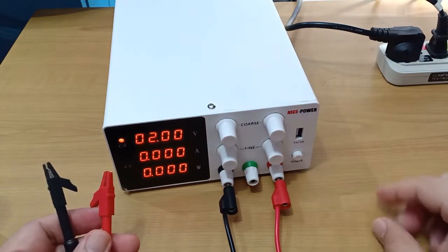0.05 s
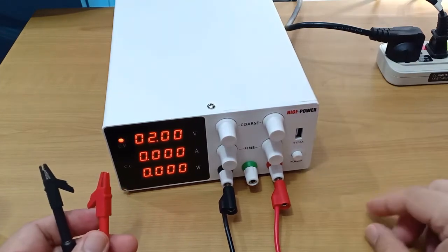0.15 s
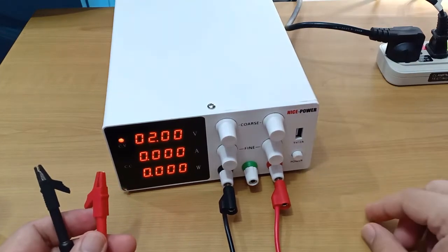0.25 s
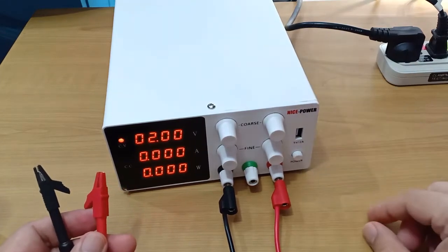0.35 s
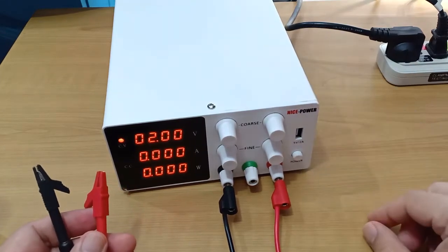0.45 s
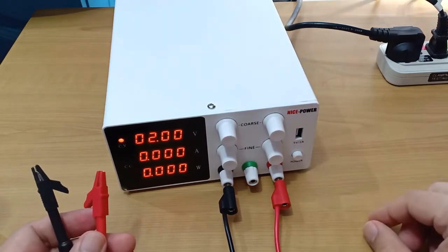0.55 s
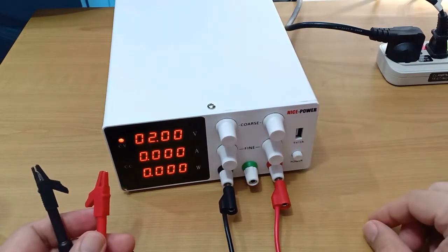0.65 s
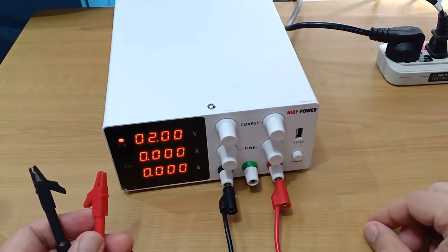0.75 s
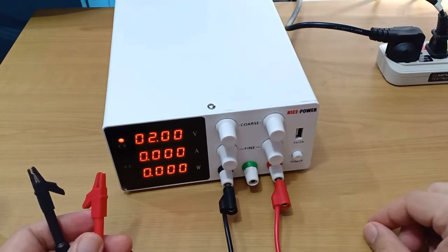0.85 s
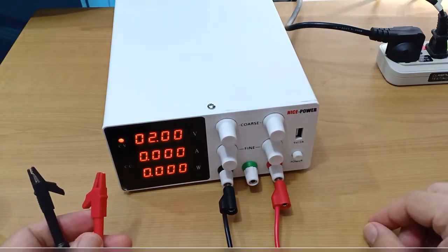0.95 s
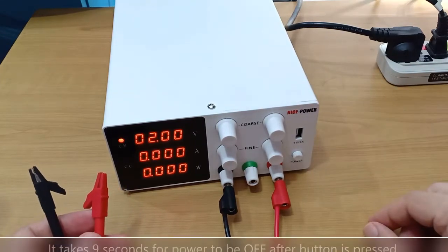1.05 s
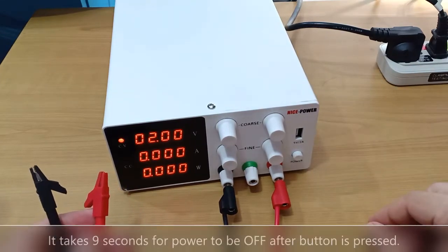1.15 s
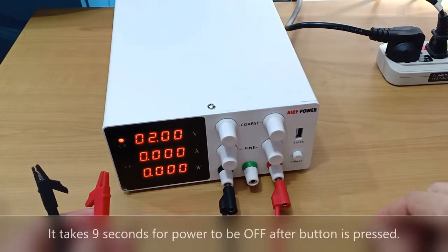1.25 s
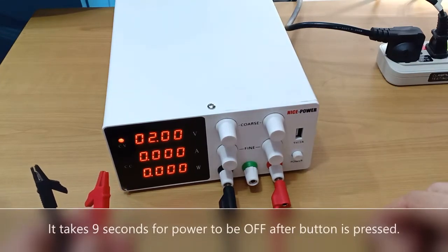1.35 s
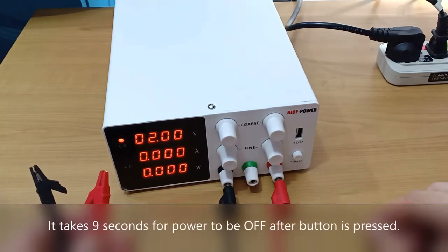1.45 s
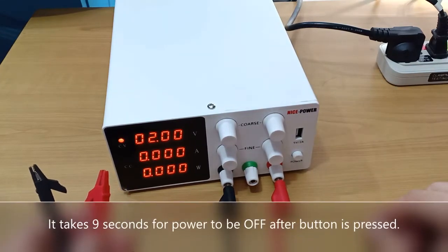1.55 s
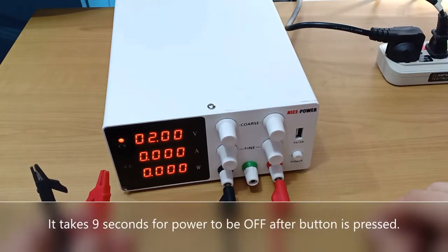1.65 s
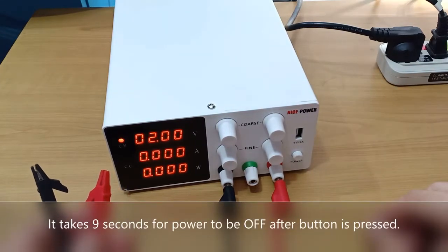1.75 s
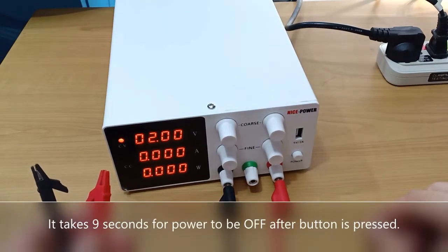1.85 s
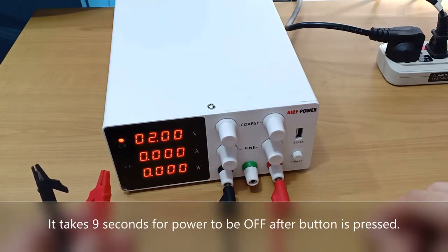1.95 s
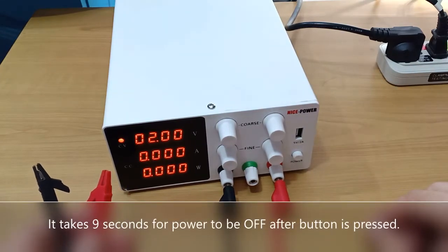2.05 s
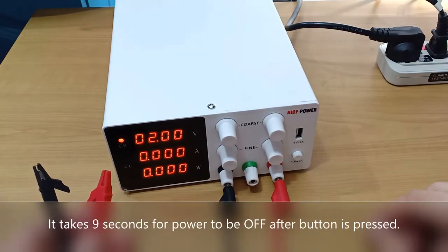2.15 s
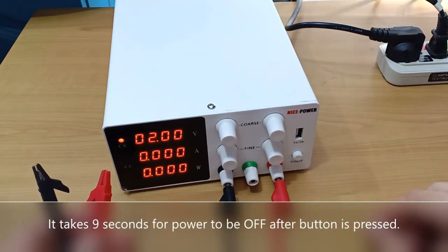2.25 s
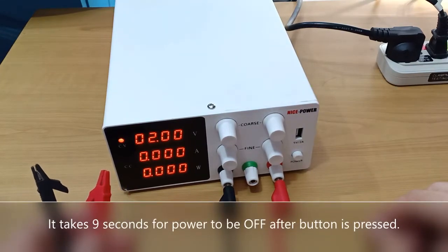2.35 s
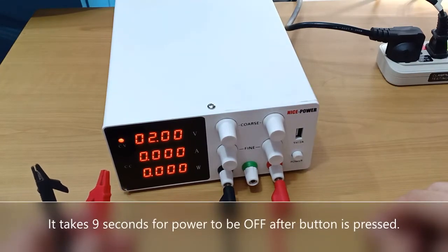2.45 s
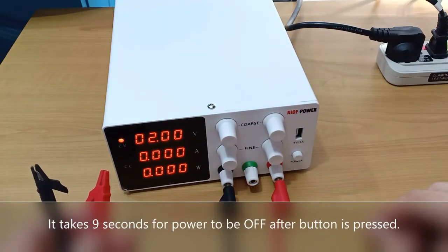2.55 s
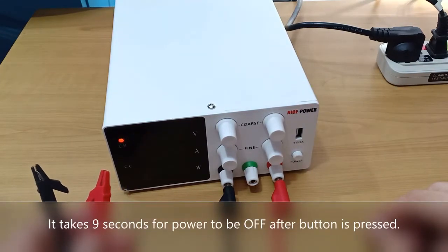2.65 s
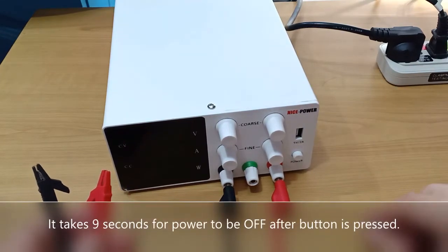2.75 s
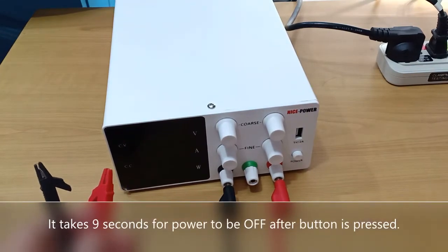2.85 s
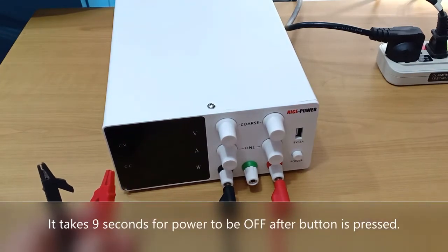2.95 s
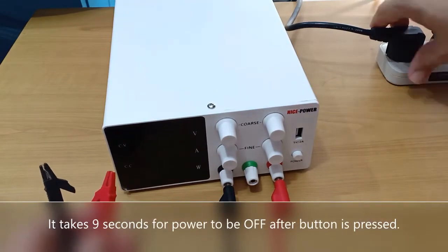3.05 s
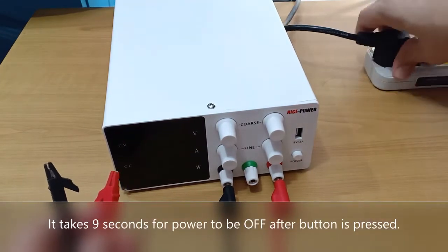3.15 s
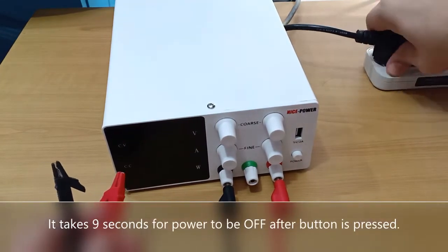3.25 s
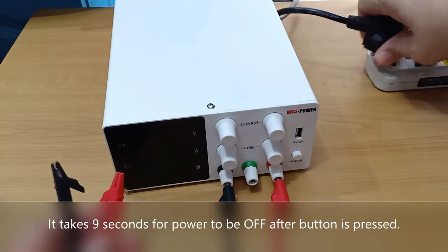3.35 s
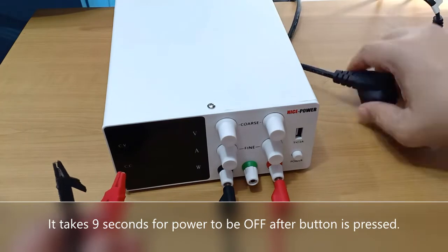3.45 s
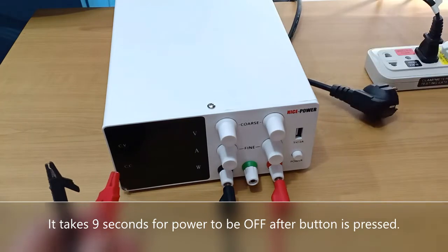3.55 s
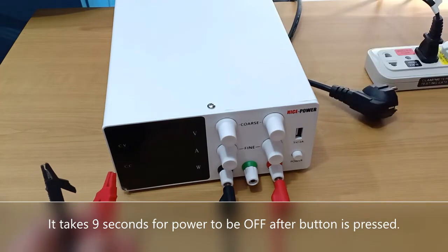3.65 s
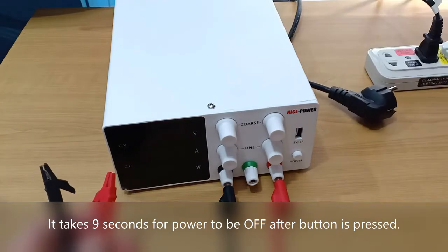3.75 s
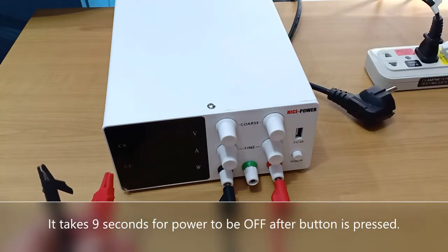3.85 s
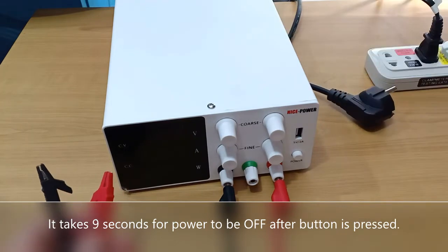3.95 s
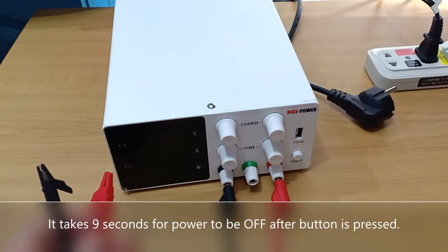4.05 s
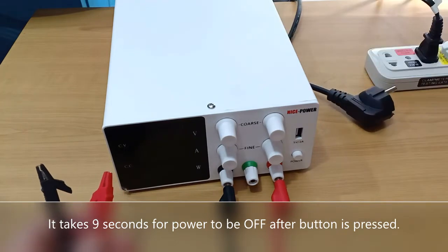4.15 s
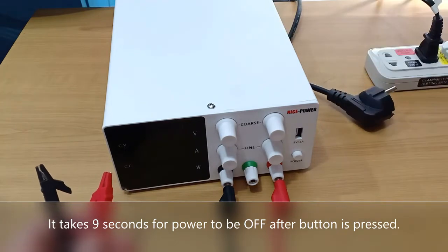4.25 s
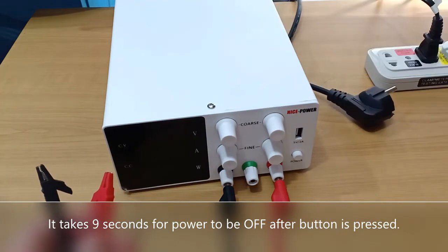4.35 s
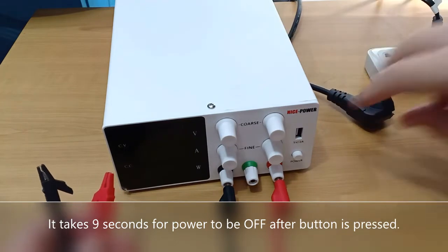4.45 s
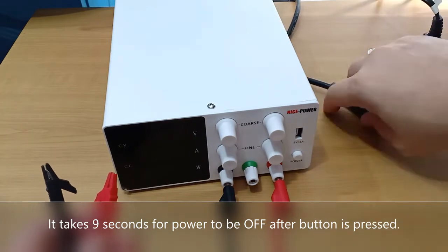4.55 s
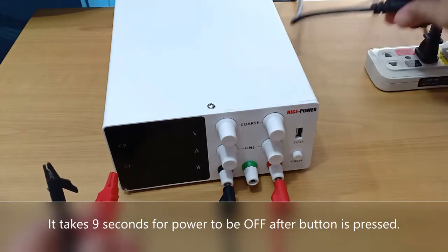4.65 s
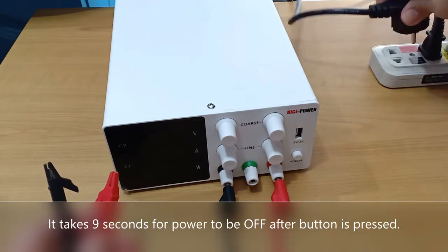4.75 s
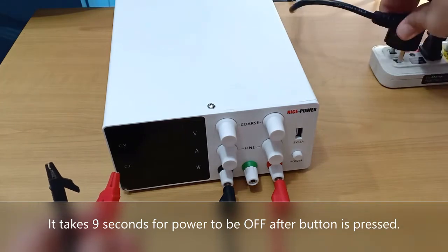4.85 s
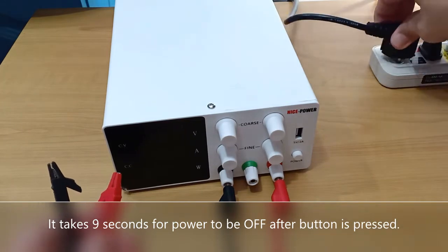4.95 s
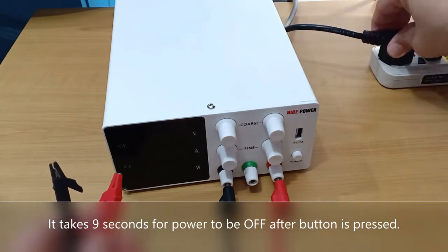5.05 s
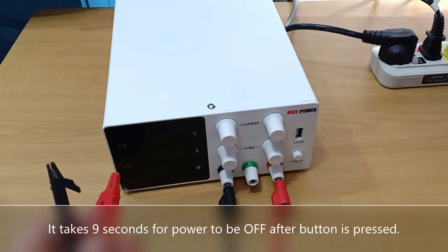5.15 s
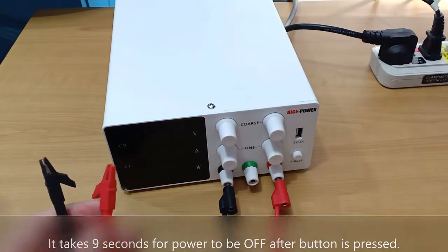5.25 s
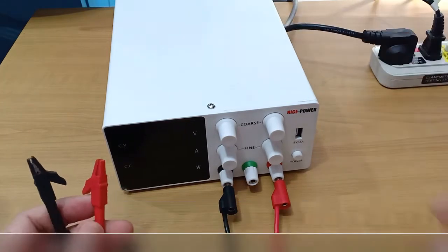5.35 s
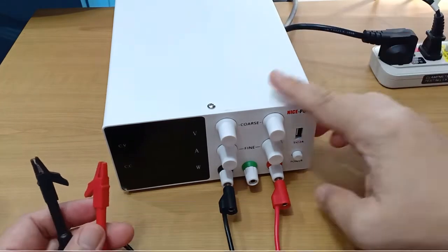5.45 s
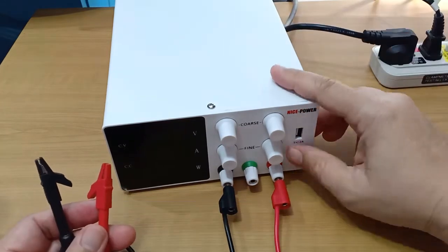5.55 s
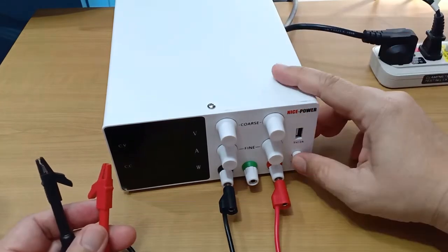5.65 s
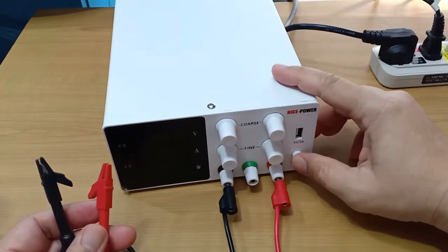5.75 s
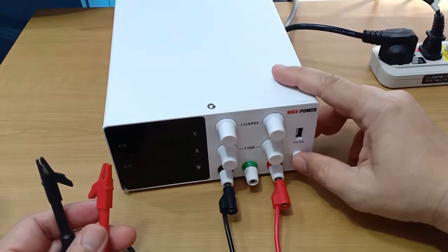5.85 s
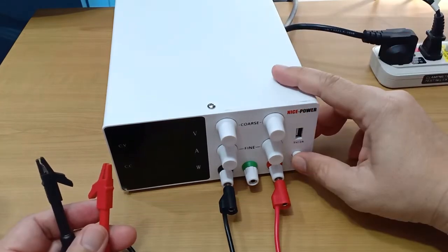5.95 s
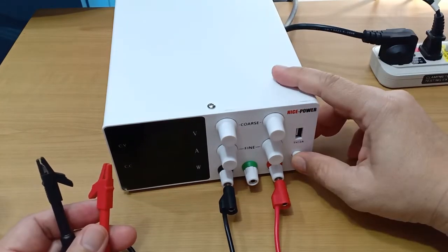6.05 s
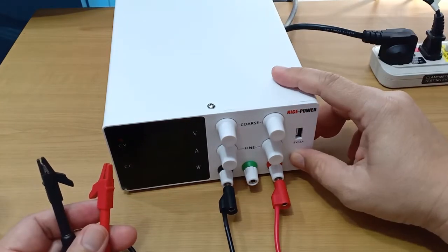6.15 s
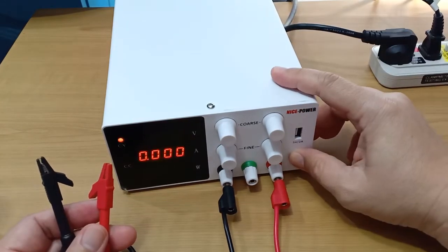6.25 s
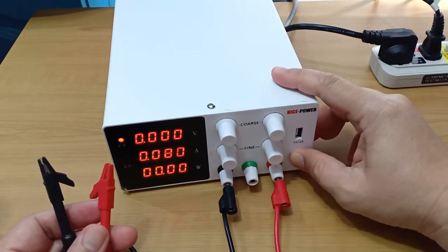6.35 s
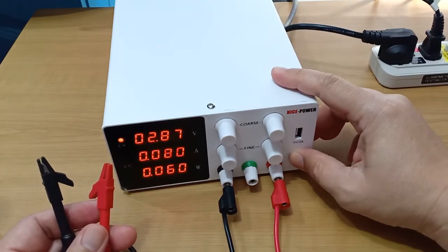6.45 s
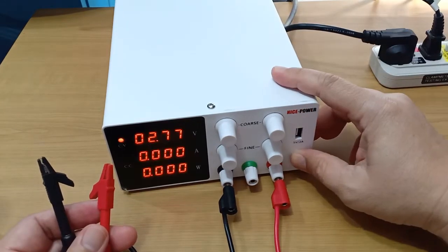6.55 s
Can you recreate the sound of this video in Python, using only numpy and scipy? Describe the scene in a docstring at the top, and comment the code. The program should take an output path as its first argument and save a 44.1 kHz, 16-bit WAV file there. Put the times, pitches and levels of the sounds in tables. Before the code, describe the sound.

In a quiet room, a faint hiss runs under a clock's quick, soft ticking, and a distant engine swells and fades. Nearby, a plug clacks and scrapes out of a plastic socket strip and is laid on a wooden desk. It is picked up and pushed back in with a firm clack. Then a bench power supply's button clicks sharply, ringing its metal case briefly, and clicks more softly on release.

```python
"""A bench power supply's plug is pulled, laid on a wooden desk and pushed back in; then its button clicks on.
Each bump of the plug rings the plastic socket strip, knocks the desk and snaps the metal pins. The button snaps
a cap and a spring, and the metal case and the room ring on for a moment. Behind it a room murmurs and a far
engine passes. Through the long middle stretch the murmur gives way to a brighter hiss, and sharp ticks come
four times a second."""
import sys
import numpy as np
from scipy import signal
from scipy.fft import rfft, irfft, next_fast_len
from scipy.io import wavfile
from scipy.ndimage import map_coordinates

SR = 44100
rng = np.random.default_rng(int(sys.argv[2]) if len(sys.argv) > 2 else 0)


def digitize_waveform(pressure):
    """Quantize a signal to 16-bit integers and store it at the path in sys.argv[1].

    Rows of a 2-D input are taken as channels; values are limited to [-1, 1].
    """
    field = np.atleast_2d(pressure).T
    bounded = np.clip(field, -1, 1)
    quanta = np.round(bounded * 32767).astype(np.int16)
    wavfile.write(sys.argv[1], SR, quanta)


N = 291187
HISS_START_S, HISS_END_S = 0.6464, 5.717


def amp(db):
    """Turn decibels into a gain; amp(-60 * t / t60) fades by 60 dB in t60 seconds."""
    return 10 ** (np.asarray(db) / 20)


def unit(x):
    """Scale a steady sound to an average strength (rms) of 1."""
    return x / np.sqrt(np.mean(x ** 2) + 1e-20)


def unit_hit(x):
    """Scale a short sound, ear by ear, to the energy of 10 ms at rms 1."""
    return x * np.sqrt(SR / 100 / (np.sum(x ** 2, axis=-1, keepdims=True) + 1e-20))


def along(points, hz):
    """Read between (f/Hz, value) points, on a log frequency scale."""
    freqs, values = np.transpose(points)
    return np.interp(np.log(hz + 1), np.log(freqs + 1), values)


def seconds(size):
    return np.arange(size) / SR


def wobble(rate):
    """A smooth curve through `rate` random values a second."""
    return map_coordinates(rng.standard_normal(int(N * rate / SR) + 4), [seconds(N) * rate])


def filtered(x, response):
    """Pass x through a filter, given as a function of frequency."""
    size = 2 * next_fast_len(x.shape[-1] // 2 + 4096)
    return irfft(rfft(x, size) * response(np.fft.rfftfreq(size, 1 / SR)), size)[..., :x.shape[-1]]


def colour(points):
    """A filter shaped by (f/Hz, level/dB) points that never rings ahead of the sound."""
    def response(hz):
        cepstrum = irfft(np.log(amp(along(points, hz))))
        cepstrum[1:len(hz) - 1] *= 2
        cepstrum[len(hz):] = 0
        return np.exp(rfft(cepstrum))
    return response


def resonances(modes):
    """A filter that rings at each (f/Hz, width/Hz, level/dB); narrow ones ring longer."""
    return lambda f: sum((-1) ** k * amp(db) * 1j * f * width / (hz * hz - f * f + 1j * f * width)
                         for k, (hz, width, db) in enumerate(modes))


def panned(sound, pan_db):
    """Make the left ear pan_db louder than the right."""
    return sound * amp([[pan_db / 2], [-pan_db / 2]])


def add(track, start_s, sound, pan_db=0):
    """Mix a stereo sound into the track."""
    part = track[:, round(start_s * SR):][:, :sound.shape[1]]
    part += panned(sound, pan_db)[:, :part.shape[1]]


def noise(size, alike):
    """Stereo white noise; `alike` lists (f/Hz, likeness), where 1 is the same in both ears."""
    mid, side = rng.standard_normal((2, size))
    angle = lambda hz: np.arccos(np.clip(along(alike, hz), -1, 1)) / 2
    mid = filtered(mid, lambda hz: np.cos(angle(hz)))
    side = filtered(side, lambda hz: np.sin(angle(hz)))
    return np.array([mid + side, mid - side])


def whines(tones):
    """Thin tones that waver in strength and pitch."""
    t = seconds(N)
    return sum(np.sqrt(2) * amp(db + 1.9 * wobble(7.5)) * np.sin(2 * np.pi * hz * t + 0.94 * wobble(14))
               for hz, db in tones)


# Tone colour of the room's murmur: f/Hz, relative level/dB
MURMUR_COLOUR = [(15, -46.5), (25, -19), (33, -15), (161, -13), (277, -6), (677, -15), (796, -13.5),
                 (936, -17.5), (1020, -13), (1440, -16), (1840, -16), (2550, -15.5), (3430, -28),
                 (14000, -42.5), (16000, -54)]
# How alike the murmur is in both ears: f/Hz, likeness
MURMUR_ALIKE = [(60, 0.29), (180, 0.8), (550, 0.56), (1650, -0.15), (4970, 0.091), (15000, -0.18)]
# Faint whines in the room: f/Hz, relative level/dB
MURMUR_WHINES = [(274.5, -75.5), (818.3, -83), (1637, -82), (1836, -85), (1873, -75.5)]
def room_murmur():
    """A low, slightly restless rush with faint whines in it."""
    level = amp(-59.5 + 0.55 * wobble(25))
    rush = unit(filtered(noise(N, MURMUR_ALIKE), colour(MURMUR_COLOUR)))
    return level * rush + amp(1) * whines(MURMUR_WHINES)


# Tone colour of the hiss: f/Hz, relative level/dB
HISS_COLOUR = [(20, -6.5), (50, -14.5), (150, -23), (280, -9.5), (700, -7.5), (1150, -4.5), (1800, -6),
               (2700, -10.5), (5500, -11.5), (9500, -12.5), (11300, -14), (13500, -23), (16000, -25.5)]
# How alike the hiss is in both ears: f/Hz, likeness
HISS_ALIKE = [(60, 0.84), (180, 0.22), (550, 0.57), (1650, 0.53), (4970, 0.11), (15000, 0.1)]
# Whistly bands in the hiss: f/Hz, width/Hz, relative level/dB
HISS_BANDS = [(1380, 150, 0.5), (3155, 110, -3.5), (4280, 130, -2), (5190, 120, -6), (7600, 170, -6),
              (9000, 710, -6.5)]
# High whines in the hiss: f/Hz, relative level/dB
HISS_WHINES = [(958.2, -76), (1093, -74.5), (1249, -74), (3122, -84), (4215, -84), (5180, -83),
               (6245, -86.5), (6557, -82.5), (7335, -81.5), (7494, -81)]
def bright_hiss():
    """A steady, bright hiss with whistly bands and high whines."""
    hiss = amp(-60.22) * unit(filtered(noise(N, HISS_ALIKE), colour(HISS_COLOUR)))
    bands = amp(-70) * unit(filtered(noise(N, HISS_ALIKE), resonances(HISS_BANDS)))
    return hiss + bands + amp(-0.5) * whines(HISS_WHINES)


def background():
    """Murmur, then hiss, then murmur again; the level dips briefly at each handover."""
    t = seconds(N)
    inside_s = np.minimum(t - HISS_START_S, HISS_END_S - t)  # negative outside the hiss
    murmur_fade = np.clip(-inside_s / 0.04, 0, 1)
    hiss_fade = np.clip(inside_s / 0.05, 0, 1)
    return panned(murmur_fade * room_murmur() + hiss_fade * bright_hiss(), pan_db=-1.4)


# Engine overtones that get indoors: multiple of the firing rate, relative level/dB
ENGINE_OVERTONES = [(4, -4), (5, 1), (6, -6), (7, -3.5), (8, -7)]
def vehicle():
    """A far engine swells, eases off and sinks in pitch, blurred by its many paths indoors."""
    steady_hz, ease_off_s, sag_hz_per_s, pass_s = 80.2, 1.97, 18, 2.17
    t = seconds(N)
    firing_hz = np.maximum(steady_hz - sag_hz_per_s * np.maximum(t - ease_off_s, 0), steady_hz / 2)
    phase = 2 * np.pi * np.cumsum(firing_hz) / SR
    before, after = np.maximum(pass_s - t, 0), np.maximum(t - pass_s, 0)
    throttle_drop_db = np.minimum(88 * after, 8.5)
    db = -69.5 - 19 * before - throttle_drop_db - 9.5 * after  # swells, drops, coasts away
    drone = sum(amp(level + 4.4 * wobble(4.9)) * np.sin(round(multiple) * phase + 0.9 * wobble(22))
                for multiple, level in ENGINE_OVERTONES)
    return amp(db) * drone


# Tone colour of one tick: f/Hz, relative level/dB
TICK_COLOUR = [(400, -42.5), (800, -14.5), (1050, 2), (1500, -15.5), (3000, -21), (6000, -15.5),
               (10000, -10.5), (15000, -30)]
def clock():
    """Sharp ticks come four times a second, slowly getting quieter."""
    out, t = np.zeros((2, N)), seconds(SR // 10)
    envelope = amp(-60 * t / 0.057) * (1 - np.exp(-t / 0.0017))
    for start in np.arange(0.699, HISS_END_S - 0.1, 1 / 4):
        burst = noise(len(t), [(1000, 0.9), (8000, 0.19)]) * envelope
        db = -52 - 1.17 * start + rng.normal(0, 0.48)
        add(out, start, amp(db) * unit_hit(filtered(burst, colour(TICK_COLOUR))), pan_db=-2.5)
    return out


# How long the room echoes: f/Hz, time to fade by 60 dB/s
ROOM_FADE = [(200, 0.11), (1000, 0.15), (5000, 0.15), (14000, .14)]
def room_tail():
    """A wash of echoes in which each frequency dies at its own speed."""
    size = SR // 2
    wash = noise(size, [(300, 0.8), (1500, 0.32), (5000, 0.09)])
    hz, t, spectrum = signal.stft(wash, SR, nperseg=128)
    fade = amp(-60 * t / along(ROOM_FADE, hz)[:, None])
    return signal.istft(spectrum * fade, SR, nperseg=128)[1][:, :size]


# Notes of the wooden desk top: f/Hz, width/Hz, relative level/dB
DESK_NOTES = [(316, 90, -5), (506, 84, 2), (780, 300, -2.5)]
def desk_knock(push):
    """The desk answers a push with a dull knock."""
    return unit_hit(filtered(push, resonances(DESK_NOTES)))


# Tone colour of the struck case: f/Hz, relative level/dB
CASE_COLOUR = [(88, -62), (150, -35), (612, -4), (745, -13), (979, -8.5), (1210, -9.5), (1530, -3),
               (2140, -4), (2810, 1.5), (3420, -9.5), (5050, -2), (8560, -14.5), (9630, -21),
               (10600, -20.5), (16000, -18)]
# Ringing notes of the steel case: f/Hz, relative level/dB, time to fade by 60 dB/s
CASE_NOTES = [(805, -23, 0.2), (1600, -27, 0.25), (1876, -17, 0.14), (2700, -20.5, 0.13), (2980, -21, .12),
              (3590, -36, .16), (4900, -28, 0.136), (5200, -27, 0.21), (5655, -36, .14), (6950, -35, .12)]
def case_ring(t):
    """The jolted case sounds into the room, and its sheet-metal lid pings longest."""
    echo = amp(-3.5) * unit_hit(filtered(room_tail(), colour(CASE_COLOUR)))
    notes = sum(amp(db - 60 * t / t60) * np.sin(2 * np.pi * (hz * t + rng.random((2, 1))))
                for hz, db, t60 in CASE_NOTES)
    lid = amp(-28 - 60 * t / 0.75) * np.sin(2 * np.pi * 980 * t)
    return echo + notes + lid


def cap_rub():
    """The button's cap scrapes along its guide just before the latch snaps."""
    out, size = np.zeros((2, N)), round(0.04 * SR)
    rub = filtered(noise(size, [(3000, 0.4)]), resonances([(2860, 100, 0)]))
    add(out, 6.166, amp(-62.5) * unit(rub * signal.windows.tukey(size, 0.3)), pan_db=-4)
    return out


# Notes of the button's plastic cap: f/Hz, width/Hz, relative level/dB
CAP_NOTES = [(2845, 137, 7.5), (5100, 790, -11)]
# Notes of its spring: f/Hz, width/Hz, relative level/dB
SPRING_NOTES = [(6150, 140, 5), (13000, 340, -13), (15250, 650, -10)]
# Clicks going down and coming up (relative levels): t/s, level/dB, cap/dB, spring/dB, case/dB
BUTTON_CLICKS = [(6.125, -56, -2, -7, -18), (6.168, -53, -1, -10, -13), (6.2067, -19.5, -1, -5, -1),
                 (6.570, -39.5, -4.5, 4.5, -0.5)]
def button():
    """The latch snaps the cap and spring; the desk thumps and the case rings on."""
    out, t = np.zeros((2, N)), seconds(SR // 2)
    envelope = amp(-60 * t / 0.013) * (1 - np.exp(-t / 0.00036))
    for start, db, cap_db, spring_db, case_db in BUTTON_CLICKS:
        snap = noise(len(t), [(1000, 0.7), (6000, 0.093)]) * envelope
        cap = amp(cap_db - 3) * unit_hit(filtered(snap, resonances(CAP_NOTES)))
        spring = amp(spring_db - 8) * unit_hit(filtered(snap, resonances(SPRING_NOTES)))
        case_and_desk = amp(case_db) * (case_ring(t) + amp(-23) * desk_knock(snap))
        add(out, start, amp(db) * (cap + spring + case_and_desk), pan_db=-2)
    return out


def contact(t60, crack_db, tail_db):
    """Two hard things meet: a sharp crack, quick echoes off things nearby and a weak tail."""
    t = seconds(SR // 5)
    scatter = noise(len(t), [(500, 1.0), (2000, 0.72), (4000, 0.4), (10000, 0)])
    burst = noise(len(t), [(500, 0.93), (2000, 0.021), (4000, 0.17), (10000, 0)])
    crack = unit_hit(burst * amp(-60 * t / 0.0028))
    echoes = unit_hit(scatter * amp(-60 * t / t60))
    tail = unit_hit(scatter * amp(-60 * t / 0.045))
    return echoes + amp(crack_db) * crack + amp(tail_db) * tail


def ping(hz, width_hz, size):
    """One struck note, reaching the right ear a moment after the left."""
    t = np.maximum(seconds(size) - np.array([[0], [1]]) / SR, 0)
    envelope = np.exp(-np.pi * width_hz * t) * (1 - np.exp(-t / 0.0006))
    return unit_hit(np.sin(2 * np.pi * hz * t) * envelope)


# Notes of the plastic socket strip: f/Hz, width/Hz, relative level/dB
STRIP_NOTES = [(974, 120, -0.5), (1466, 285, 0.5), (1830, 130, 2.5), (2230, 200, 5.5), (2670, 650, -2),
               (3930, 730, -4)]
# The strip's lower rings are wider, so they die sooner: f/Hz, width/Hz
RING_WIDTHS = [(1300, 490), (1800, 400), (2150, 120)]
# A small shell gives off little bass: f/Hz, relative level/dB
SHELL_COLOUR = [(150, -27), (600, -9.5), (950, 2.5)]
# Tone colour of the metal pins: f/Hz, relative level/dB
PIN_COLOUR = [(2000, -24.5), (4500, -9), (5600, -3), (6800, -4.5), (7600, -4.5), (9000, -3.5),
              (10400, -1.5), (12200, -8.5), (14000, -12), (16000, -12)]
def clack(body_db, ring_hz, knock_db, snap_db, pin_hz):
    """One bump of the plug rings the plastic strip, knocks the desk and snaps the metal pins."""
    push = contact(t60=0.054, crack_db=-10, tail_db=-13)
    size, ring_width = push.shape[1], along(RING_WIDTHS, ring_hz)
    shell = amp(-0.5) * unit_hit(filtered(push, resonances(STRIP_NOTES)))
    # the struck spot is heard directly, then again off things nearby
    ring = ping(ring_hz, ring_width, size)
    ring_echo = amp(-1.5) * unit_hit(filtered(push, resonances([(ring_hz, ring_width, 0)])))
    body = amp(body_db) * unit_hit(filtered(ring + ring_echo + shell, colour(SHELL_COLOUR)))
    knock = amp(knock_db) * desk_knock(contact(t60=0.043, crack_db=4, tail_db=-9))
    pin_push = contact(t60=0.037, crack_db=-5, tail_db=-21.5)
    pin_echo = amp(1.5) * unit_hit(filtered(pin_push, resonances([(pin_hz, 800, 0)])))
    pin_ring = amp(-7.5) * (ping(pin_hz, 650, size) + pin_echo)
    pin_click = unit_hit(filtered(pin_push, colour(PIN_COLOUR)))
    snap = amp(snap_db + 3) * unit_hit(pin_click + pin_ring)
    # the strip lies to the right, and the far ear loses more treble than bass
    return panned(body + knock, pan_db=-1.4) + panned(snap, pan_db=-3.5)


# Rumble of the desk under a sliding hand: f/Hz, relative level/dB
RUMBLE_COLOUR = [(60, -26), (160, -17), (290, 3), (480, -6), (750, -7.5), (1100, -22), (2500, -52)]
def slide(length_s, plastic_db, hiss_db, desk_db):
    """Sliding is a run of tiny slips that shake the plastic, the pins and the desk."""
    size = max(round(length_s * SR), 64)
    slips = noise(size, [(500, 0.52), (6000, 0.061)]) * amp(2.1 * wobble(445)[:size])
    slips *= signal.windows.tukey(size, 0.6)  # fade in and out
    plastic = amp(plastic_db) * unit(filtered(slips, resonances(STRIP_NOTES)))
    hiss = amp(hiss_db) * unit(filtered(slips, colour(PIN_COLOUR)))
    rumble = amp(desk_db) * unit(filtered(slips, colour(RUMBLE_COLOUR)))
    return plastic + hiss + rumble


# Plug and cable sliding: start/s, end/s, level/dB
PLUG_SCRAPES = [(3.169, 3.22, -57.5), (3.252, 3.339, -62.5), (3.357, 3.399, -49), (3.463, 3.533, -50.5),
                (3.516, 3.614, -55), (4.696, 4.761, -57), (4.775, 4.98, -62), (5.142, 5.19, -62)]
# A hand brushing the desk and case: start/s, end/s, level/dB
HAND_RUBS = [(0.0, 0.135, -65), (4.552, 4.679, -62), (5.74, 5.781, -61), (6.28, 6.303, -61)]
def scrapes_and_rubs():
    """The hard plug scrapes brightly; the soft hand makes more rumble and less hiss."""
    out = np.zeros((2, N))
    for start, end, db in PLUG_SCRAPES:
        add(out, start, slide(end - start, db, hiss_db=db - 2, desk_db=db - 29.5), pan_db=-1)
    for start, end, db in HAND_RUBS:
        add(out, start, slide(end - start, db, hiss_db=db - 22, desk_db=db), pan_db=0.5)
    return out


def plug_wiggle():
    """Rocked loose in its socket, the plug catches and lets go in faint, uneven ticks."""
    start_s, end_s, gap_s = 3.248, 3.292, 0.022
    out = np.zeros((2, N))
    for slot in np.arange(start_s, end_s - gap_s / 2, gap_s):
        db = rng.normal(-57, 1.5)
        start = slot + gap_s * rng.uniform(0.2, 0.93)
        add(out, start, clack(db, ring_hz=1780, knock_db=db - 10, snap_db=db, pin_hz=9700))
    return out


# The plug's bumps on socket and desk (relative levels):
# t/s, plastic level/dB, ring f/Hz, desk level/dB, pin level/dB, pin f/Hz
PLUG_BUMPS = [(2.8197, -52.5, 2050, -57.5, -51.5, 11400), (2.971, -48, 2100, -68, -66, 4600),
              (3.074, -52.5, 960, -55.5, -57, 7600), (3.142, -56, 1900, -64, -62, 6700),
              (3.3028, -52.5, 1760, -69, -53, 7100), (3.3514, -32, 1250, -49, -29, 8600),
              (3.3707, -34, 1830, -54, -32.5, 5520), (3.4053, -33.5, 2160, -64, -37, 6200),
              (3.4876, -34.5, 1550, -64, -41.5, 4430), (3.498, -48, 2090, -55.5, -41.5, 8400),
              (3.5739, -41, 1370, -69, -61, 4540), (3.5802, -50, 1800, -56, -59, 4470),
              (4.575, -45.5, 1900, -59, -54, 5300), (4.657, -69, 900, -51, -78, 7500),
              (4.869, -35.5, 2263, -58, -30.5, 9300), (5.0433, -24.5, 1740, -41, -24.5, 10250),
              (5.075, -53.5, 1670, -55, -52, 10300)]
def plug():
    """The plug clacks as it is gripped, pulled, laid down, picked up and pushed home."""
    out = np.zeros((2, N))
    for start, *bump in PLUG_BUMPS:
        add(out, start, clack(*bump))
    return out


def scene():
    """The plug and button, over the clock, the far engine and the background."""
    power_supply = plug() + plug_wiggle() + scrapes_and_rubs() + cap_rub() + button()
    return power_supply + clock() + vehicle() + background()


def record(dry):
    """Cut off the very highest treble and shift the wave slightly off zero."""
    top_hz, offset = 16050, 0.0011
    return filtered(dry, lambda hz: 1 / (1 + (hz / top_hz) ** 120)) + offset


dry = scene()
out = record(dry)
digitize_waveform(out)
```